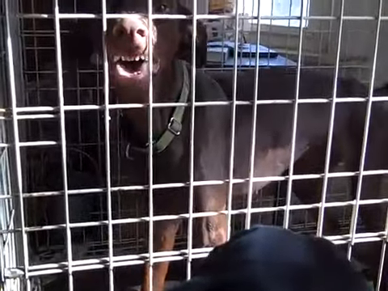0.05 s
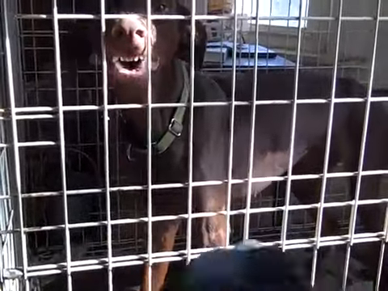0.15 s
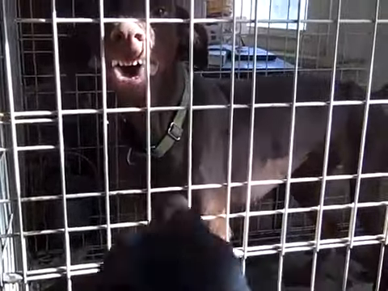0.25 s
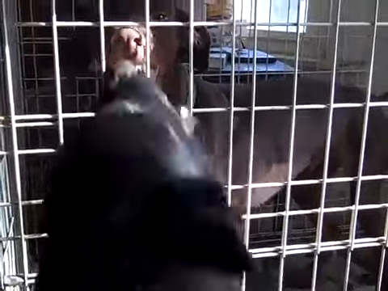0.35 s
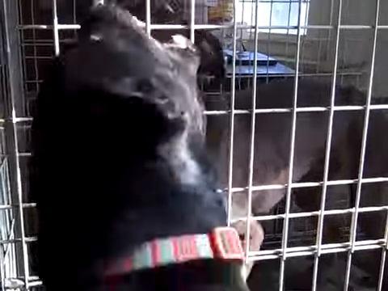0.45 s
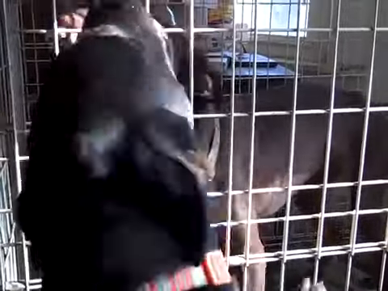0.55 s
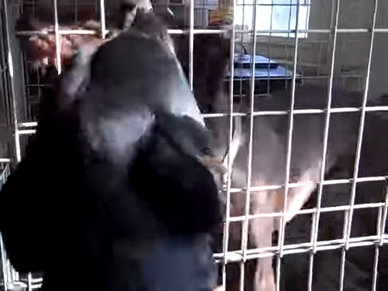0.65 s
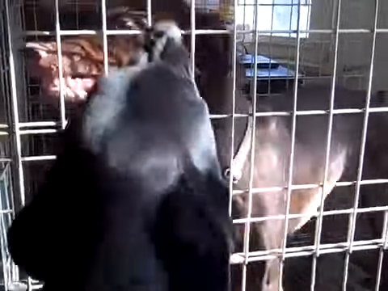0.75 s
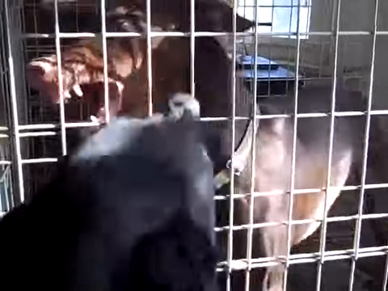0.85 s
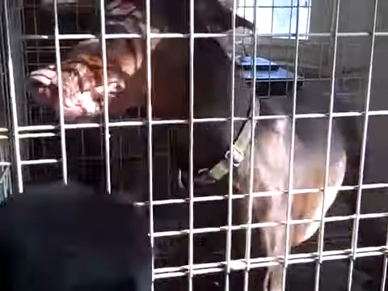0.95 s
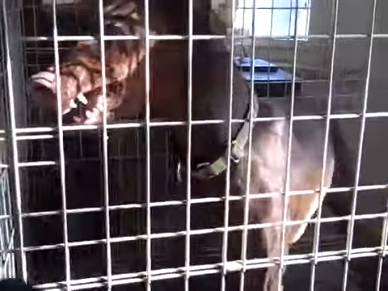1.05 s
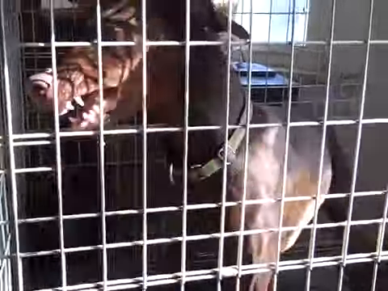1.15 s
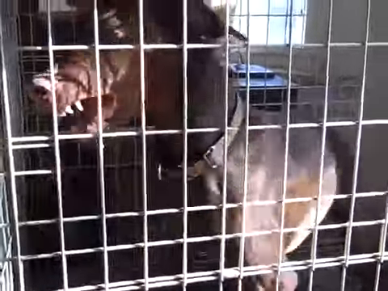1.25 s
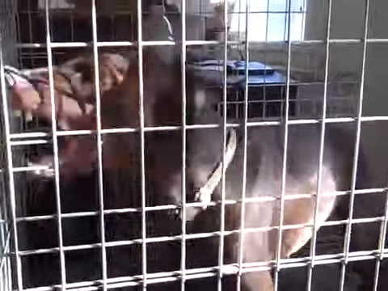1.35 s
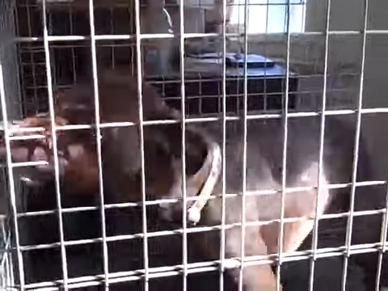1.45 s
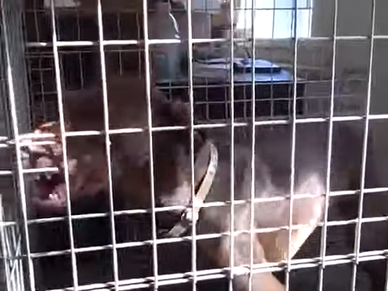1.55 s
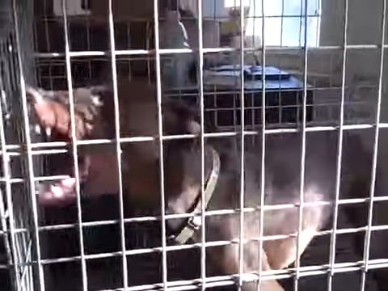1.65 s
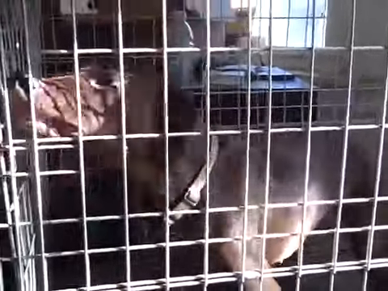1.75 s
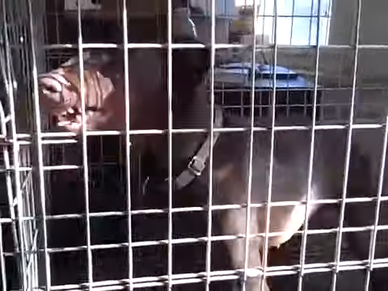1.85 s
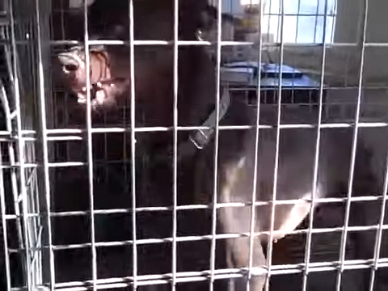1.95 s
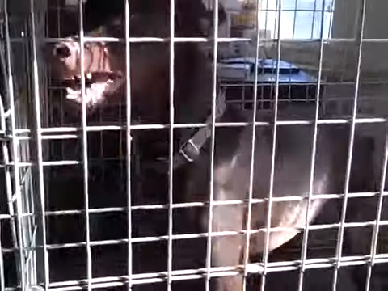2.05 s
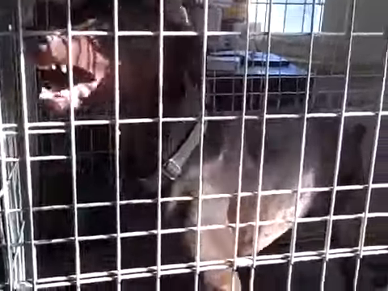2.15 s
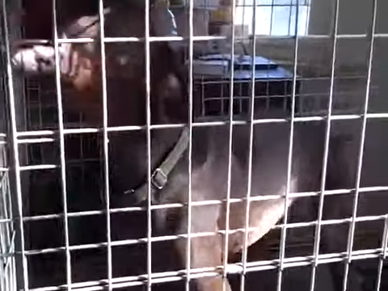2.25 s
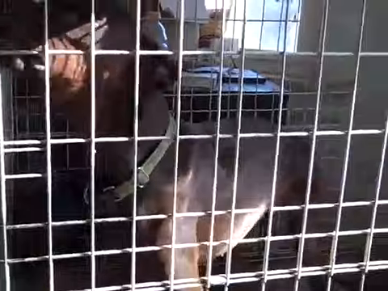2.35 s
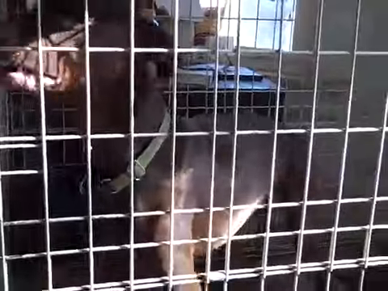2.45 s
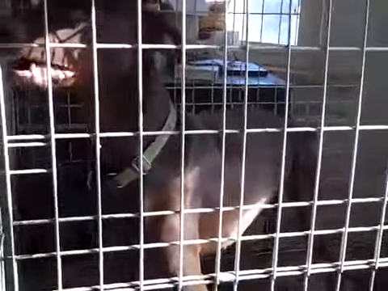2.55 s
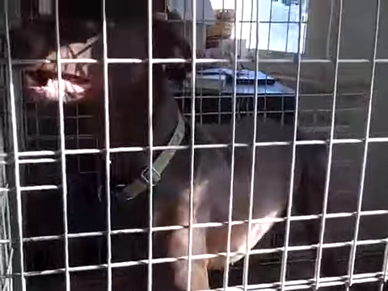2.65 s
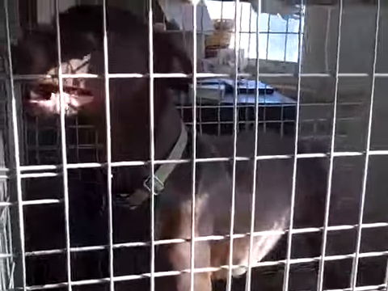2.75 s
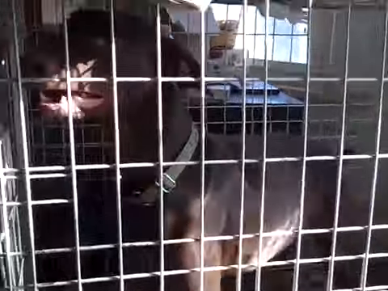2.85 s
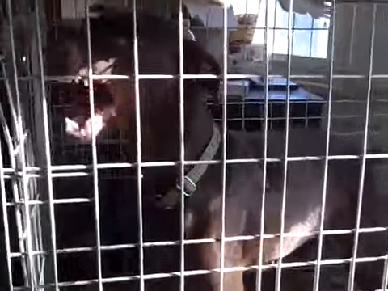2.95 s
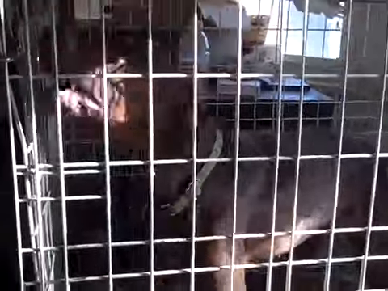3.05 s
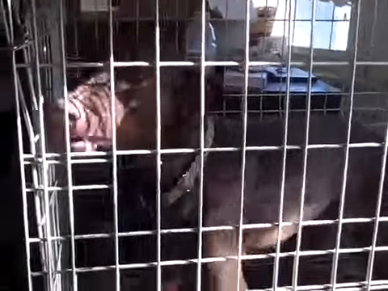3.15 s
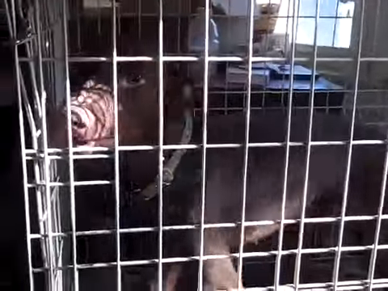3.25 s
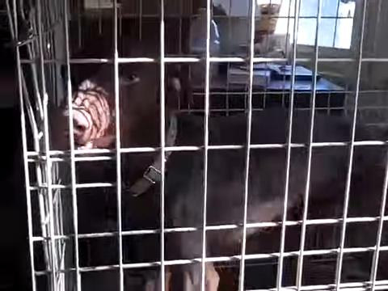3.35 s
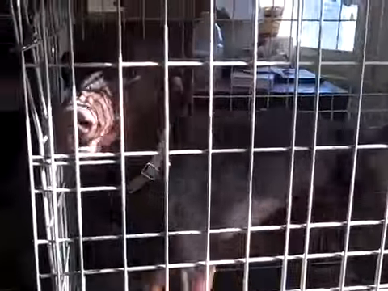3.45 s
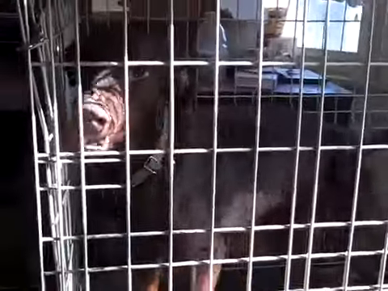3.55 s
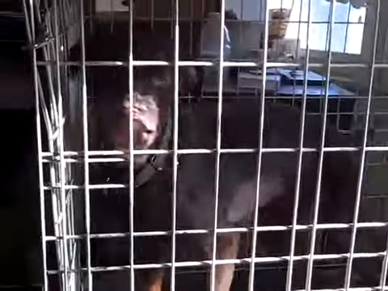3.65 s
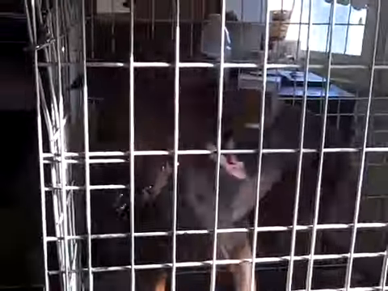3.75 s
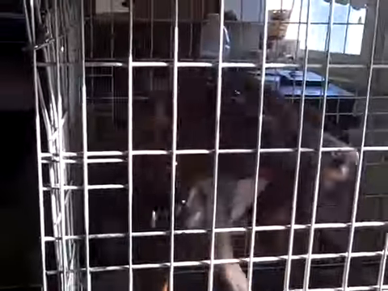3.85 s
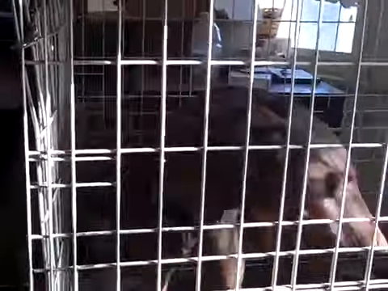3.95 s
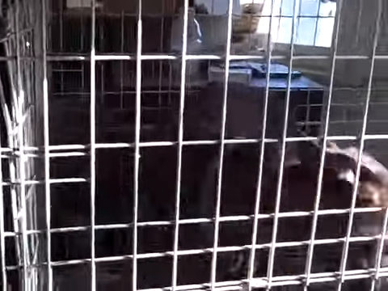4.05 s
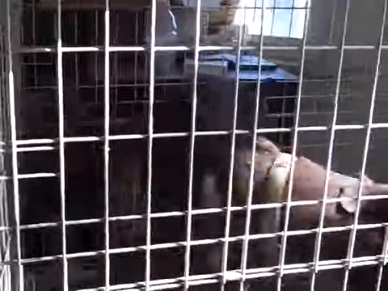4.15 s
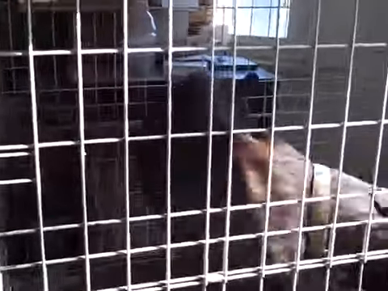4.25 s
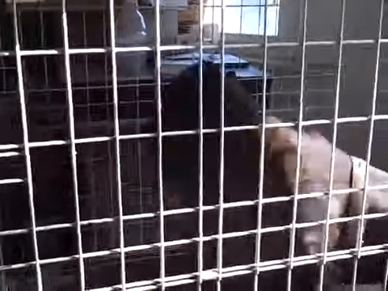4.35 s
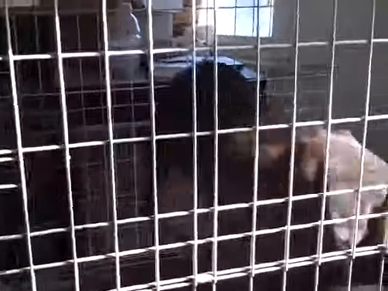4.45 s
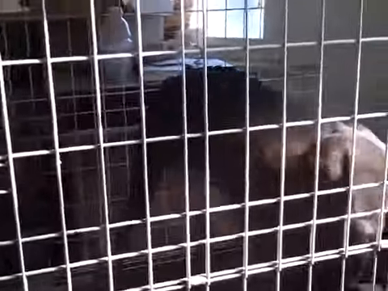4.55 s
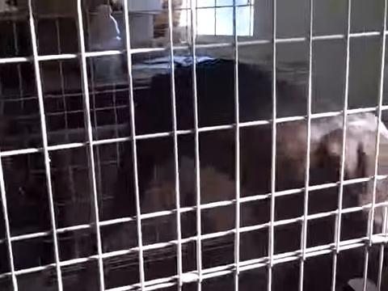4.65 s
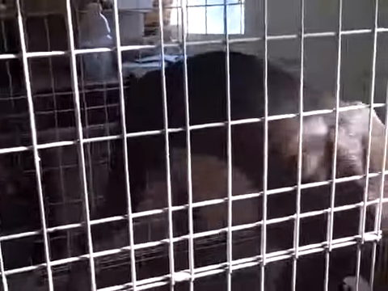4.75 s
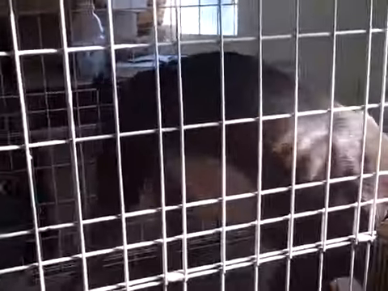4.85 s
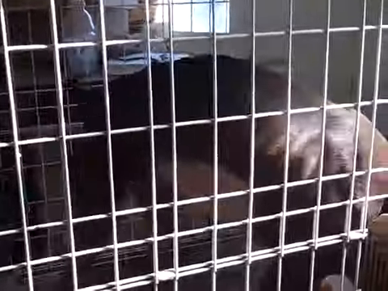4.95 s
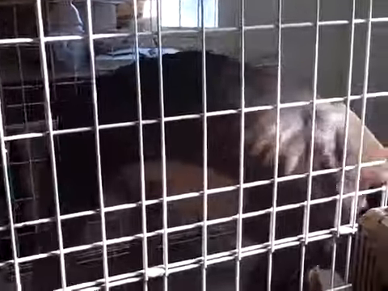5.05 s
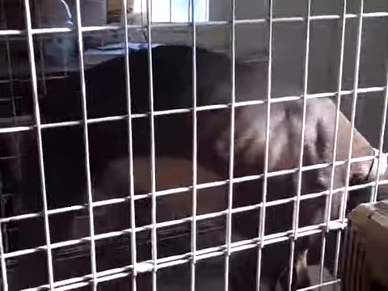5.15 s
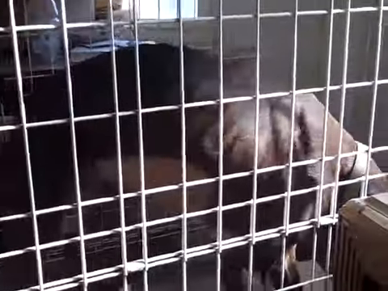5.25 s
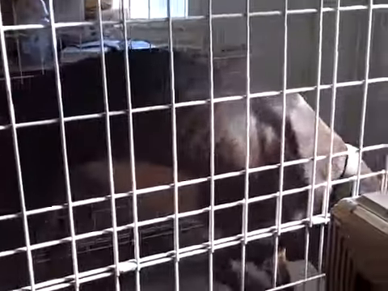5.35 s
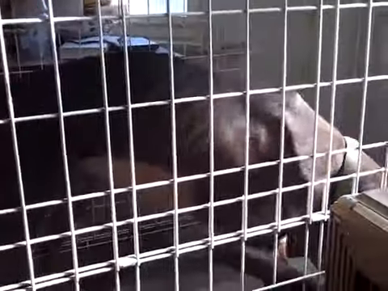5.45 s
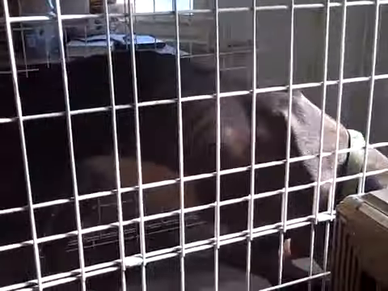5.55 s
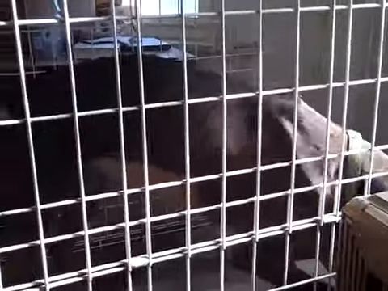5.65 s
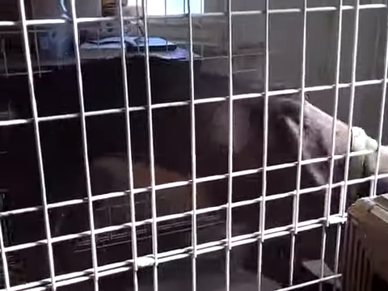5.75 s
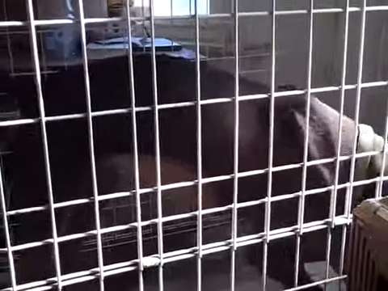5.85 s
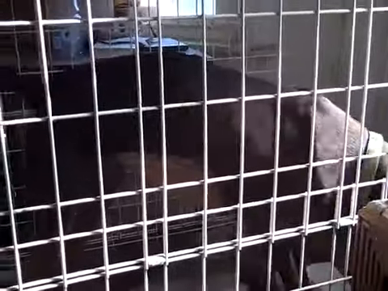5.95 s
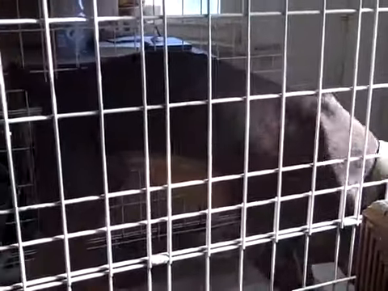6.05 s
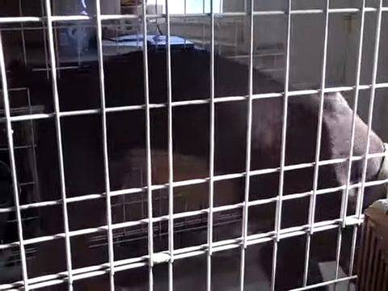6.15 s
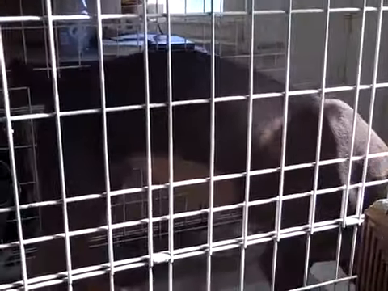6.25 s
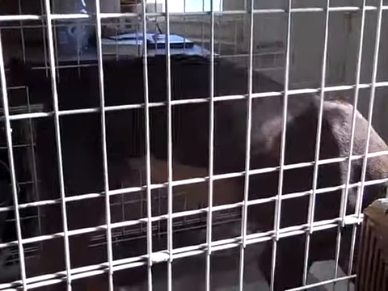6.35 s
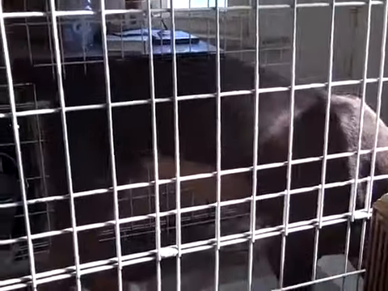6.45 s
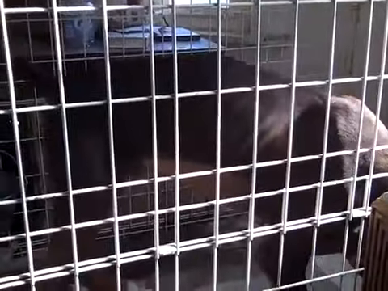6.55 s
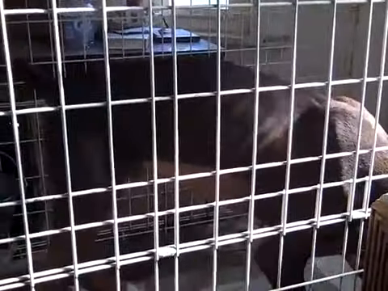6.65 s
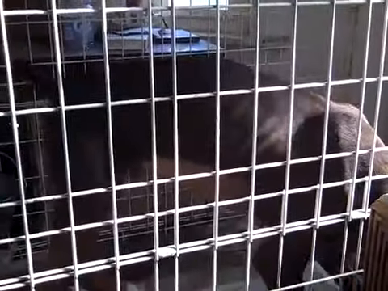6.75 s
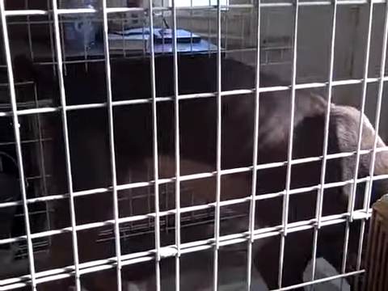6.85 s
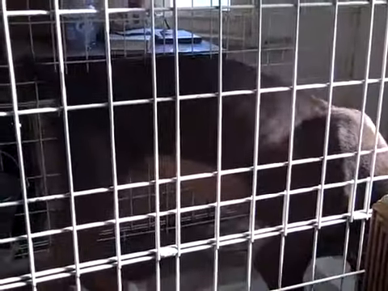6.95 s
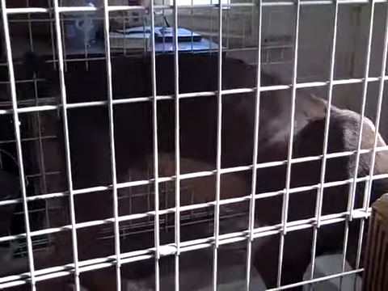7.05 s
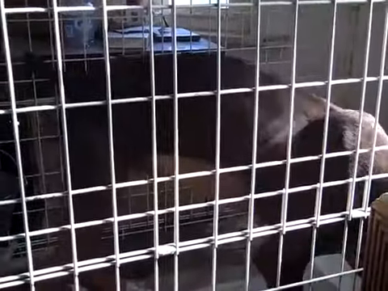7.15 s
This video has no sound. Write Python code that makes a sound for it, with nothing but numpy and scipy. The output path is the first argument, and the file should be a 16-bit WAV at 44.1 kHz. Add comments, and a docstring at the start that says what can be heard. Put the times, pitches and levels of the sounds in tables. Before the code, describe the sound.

Hoarse dog yelps, a rough snarl over a violently rattling wire crate, four sharp close barks, then paw thuds and metallic clinks indoors.

```python
"""Hoarse yelps with a thin whistle, a snarl, then sharp close barks: two dogs quarrel through a wire crate indoors.
Voices are sums of partials shaped by throat and mouth; the snarl is resonant noise gated by slow, uneven flaps.
The crate rattles (filtered clicks) and its tray thuds (noise ringing resonances) as the dog turns round.
A room tail and a faint room tone surround it; loud barks overload the recorder."""
import sys
import numpy as np
from scipy import signal
from scipy.fft import rfft, irfft, next_fast_len
from scipy.io import wavfile

SR = 44100
rng = np.random.default_rng(int(sys.argv[2]) if len(sys.argv) > 2 else 0)


def digitize_waveform(pressure):
    """Quantize a signal to 16-bit integers and store it at the path in sys.argv[1].

    Rows of a 2-D input are taken as channels; values are limited to [-1, 1].
    """
    field = np.atleast_2d(pressure).T
    bounded = np.clip(field, -1, 1)
    quanta = np.round(bounded * 32767).astype(np.int16)
    wavfile.write(sys.argv[1], SR, quanta)


N = 317079
TIME = np.arange(N) / SR


def from_db(db):
    """Decibels to gain."""
    return 10 ** (np.asarray(db) / 20)


def rms_one(x):
    """Scale to rms 1."""
    return x / np.sqrt(np.mean(x ** 2) + 1e-20)


def at_hz(points, hz):
    """Read a two-column table, linear in log frequency."""
    table_hz, values = np.array(points)[:, 0], np.array(points)[:, 1]
    return np.interp(np.log(hz), np.log(table_hz), values)


def bin_hz(size):
    """Frequencies of a real FFT, held above 0 for the log axis."""
    return np.maximum(np.arange(size // 2 + 1) * SR / size, 5)


def faded(start_s, end_s, rise_s=0.005):
    """Sample range between two times, with a short fade at both ends."""
    span = slice(int(start_s * SR), min(int(end_s * SR), N))
    t = TIME[span]
    return span, np.clip(np.minimum((t - t[0]) / rise_s, (t[-1] - t) / 0.0024), 0, 1)


def during(rows, rise_s=0.0031):
    """Sample range of a table, its fades, and its columns interpolated along that range."""
    s, *columns = np.transpose(rows)
    span, fade = faded(s[0], s[-1], rise_s)
    return span, fade, [np.interp(TIME[span], s, c) for c in columns]


def drift(rate_hz, size):
    """Random drift of rms 1: white noise through a two-pole low-pass."""
    r = np.exp(-2 * np.pi * rate_hz / SR)
    noise = rng.standard_normal(size + 4000)
    settled = signal.lfilter([1], [1, -2 * r, r * r], noise)[4000:]
    return rms_one(settled)


def coloured(x, points):
    """Filter by a table of relative dB; white noise keeps its power."""
    length = x.shape[-1]
    size = next_fast_len(length + 2048)
    gain = from_db(at_hz(points, bin_hz(size)))
    return irfft(rfft(x, size) * gain / np.sqrt(np.mean(gain ** 2)), size)[..., :length]


def resonate(x, modes):
    """Parallel two-pole resonances with alternating signs."""
    out = 0
    for k, (hz, width_hz, level_db) in enumerate(modes):
        r = np.exp(-np.pi * width_hz / SR)
        top = (1 - r * r) / 2 * np.array([1, 0, -1])
        bottom = [1, -2 * r * np.cos(2 * np.pi * hz / SR), r * r]
        out = out + (-1) ** k * from_db(level_db) * signal.lfilter(top, bottom, x + 1e-18)
    return out


def wandering(hz, width_hz):
    """Noise in a resonance whose centre moves: two drifts on quadrature carriers; rms about 1."""
    turn = 2 * np.pi * np.cumsum(hz) / SR
    return drift(width_hz, len(hz)) * np.cos(turn) + drift(width_hz, len(hz)) * np.sin(turn)


def widened(mid, side):
    """Stereo pair whose left-right likeness falls with frequency."""
    # Each row: frequency in Hz, left-right likeness 0-1.
    likeness = [(60, 1), (240, 0.9), (950, 0.82), (3770, 0.23), (15000, 0.091)]
    alike = np.clip(at_hz(likeness, bin_hz(N)), 0, 1)
    common = np.sqrt(1 + alike) * rfft(mid)
    apart = np.sqrt(1 - alike) * rfft(side) * [[1], [-1]]
    return irfft(common + apart, N) / np.sqrt(2)


def voice(pitch_hz, rough, half, blur, throat_db, count):
    """Vocal folds through the throat; rough folds wobble in pitch and strength, half adds half-pitch lines."""
    size = len(pitch_hz)
    wobbling_hz = pitch_hz * (1 + .16 * rough * drift(150, size))
    turn = np.cumsum(wobbling_hz) * np.pi / SR   # phase at half pitch
    out, power = 0, 0
    for k in range(2, count):   # odd k: half-pitch lines
        flicker_db = 7 * rough * drift(40, size)
        share = np.clip(half, 0, 1) if k % 2 else 1
        gain = from_db(throat_db(k / 2) + flicker_db) * share
        slip = blur * (k * pitch_hz / 4000) ** 2 * drift(52.4, size)   # high partials lose step
        out = out + gain * np.sin(k * turn + .35 * k * k + slip)
        power = power + gain ** 2 / 2
    return out / np.sqrt(power) * from_db(4 * rough * drift(70, size))


def room_tone():
    """Steady stereo noise with the colour of the room."""
    # Room tone spectrum. Each row: frequency in Hz, relative level in dB per Hz.
    tone_colour = [(15, -55), (25, -12.5), (177, -1), (286, -5), (616, -8.5), (741, -10), (1100, -10.5),
                   (2080, -13), (2860, -15.5), (6670, -13.5), (8030, -10), (11000, -36.5), (14000, -26)]
    level_db = -47.5
    noise = rms_one(coloured(rng.standard_normal((2, N)), tone_colour))
    return from_db(level_db) * widened(*noise)


def room(x):
    """Near walls answer in a short dense burst; ten feedback delays a side carry the long tail."""
    # Tail decay. Each row: frequency in Hz, t60 in s.
    decay = [(100, 0.74), (850, 0.65), (2000, 0.59), (4000, 0.36), (10000, 0.21)]
    size = next_fast_len(N + SR)
    hz = bin_hz(size)
    t60_s, tail = at_hz(decay, hz), np.zeros((2, len(hz)), complex)
    for k, lag_s in enumerate(rng.uniform(.03, 0.082, 20)):
        loop = from_db(-60 * lag_s / t60_s) * np.exp(-2j * np.pi * hz * lag_s)
        tail[k % 2] += loop / (1 - loop) * (-1) ** (k // 2)
    since = TIME[:8000]
    near = rng.standard_normal((2, 8000)) * from_db(-60 * since / 0.27) * (since > .004)
    near = signal.lfilter([.45], [1, -.55], near)   # the walls take some treble
    walls = from_db(-37.0) * rfft(near, size) + from_db(-24.5) * tail
    shared = walls + 0.48 * walls[::-1]   # both ports hear much the same room
    return irfft(shared * rfft(x, size), size)[:, :N]


def paws():
    """Paws on the tray: a decaying noise burst rings a low, a higher and a fixed boom resonance."""
    # Each row: start in s, peak in dB, lowest paw resonance in Hz.
    steps = [(2.215, -27, 443), (2.264, -28.5, 132), (2.924, -27, 200), (3.048, -27, 580),
             (3.715, -30, 234), (3.759, -22.5, 230), (4.287, -29, 194), (4.394, -21, 294),
             (4.509, -18.5, 496), (4.597, -25, 152), (4.791, -29, 111), (4.956, -22, 197), (5.229, -37, 88),
             (5.948, -32, 172), (6.017, -24.5, 192), (6.069, -30, 564), (6.793, -21.5, 890),
             (6.868, -29.5, 404)]
    noise_t60_s, boom_hz, boom_db = 0.25, 86, -1.5
    out = np.zeros(N)
    since = TIME[:9000]
    dying = from_db(-60 * since / noise_t60_s) * (1 - np.exp(-since / 0.00067))
    for s, peak_db, hz in steps:
        modes = [(hz, 0.77 * hz, 0), (3.07 * hz, 1.8 * hz, -9), (boom_hz, 50, boom_db)]
        thud = resonate(rng.standard_normal(9000) * dying, modes)
        at = int(s * SR)
        out[at:at + 9000] += from_db(peak_db) * thud / np.max(np.abs(thud))
    return out


def stray_ticks(count):
    """Faint blows at random moments as the wire settles, in the columns of the blow table."""
    from_s, least_db, t60_s = 4.3, -45, .045
    return [(from_s + when * (N / SR - from_s), least_db + 8 * size, t60_s, -8 * dull)
            for when, size, dull in rng.random((count, 3))]


def wire_clicks():
    """Two stereo streams of dense clicks, uneven in size, sign and rate."""
    sizes_db = 3.3 * np.minimum(rng.exponential(1, (4, N)), 5)
    sizes = from_db(sizes_db) * rng.choice([-1, 1], (4, N))
    clicks_per_s = 5000 * from_db(4.0 * drift(30, N))
    clicks = rms_one(sizes * (rng.random((4, N)) < clicks_per_s / SR))
    return widened(*clicks[:2]), widened(*clicks[2:])


def crate():
    """Wire clicks follow the shaking and dying blows, band by band, and ring the wire; the tray shuffles."""
    # Bouts of shaking. Each row: time in s, level in dB before the wire's colour.
    rattle = [
        [(0.8, -43), (0.85, -31), (0.91, -25.5), (1.02, -23.5), (1.09, -23), (1.25, -29.5), (1.35, -18),
         (1.43, -24)],
        [(2.0, -43), (2.142, -38), (2.216, -28.5), (2.335, -38)],
        [(2.76, -53), (2.974, -34), (3.09, -37)],
        [(3.56, -52), (3.652, -37.5), (3.772, -28.5), (3.815, -48)],
        [(4.18, -88), (4.33, -53), (4.49, -40.5), (4.61, -37.5), (4.76, -59), (4.89, -24.5), (4.915, -27),
         (4.96, -39), (5.09, -46.5), (5.25, -49), (5.52, -79), (5.76, -72), (5.88, -33), (6.02, -22.5),
         (6.14, -33.5), (6.28, -54), (6.51, -71), (6.65, -50), (6.74, -26), (6.85, -17.5), (7.06, -32),
         (7.19, -34)],
    ]
    # Each row, one per bout: brightness in dB per octave, tray level in dB while the shaking is at -35.5 dB.
    bouts = [(-3, -39), (-4, -48.5), (-4, -48), (-4.5, -50.5), (-0.94, -54)]
    # Blows on the wire. Each row: start in s, nominal level in dB, t60 in s, brightness in dB per octave.
    blows = list([(0.8545, -24, 0.063, -13.5), (1.4349, 6.5, 0.037, -3.3), (2.2163, -23, 0.029, -2),
                  (2.301, -23, 0.025, -16), (2.9198, -25, 0.062, -14), (3.052, -22, 0.017, -10),
                  (3.7184, -33, 0.06, 7), (3.7605, -18.5, 0.033, 2), (3.783, -21, 0.015, -13.5),
                  (4.2265, -35.5, 0.13, 1), (4.2727, -25.5, 0.053, -4), (4.344, -34.5, 0.072, -6),
                  (4.425, -32, 0.074, -6), (4.515, -21, 0.12, -2.5), (4.5365, -14, 0.21, 1.5),
                  (4.7339, -8, 0.12, 3.5), (4.771, -13, 0.1, -2.5), (4.7942, -15.5, 0.13, -5.5),
                  (4.9215, -9, 0.16, 1), (5.095, -29.5, 0.055, -2.5), (5.1741, -25.5, 0.028, -10.5),
                  (5.225, -28.5, 0.11, -5), (5.31, -39, 0.05, -5), (5.4415, -41, 0.22, -6),
                  (5.5053, -35.5, 0.035, -11), (5.7004, -28.5, 0.41, -2.5), (5.722, -24.5, 0.057, -5.5),
                  (5.7697, -33, 0.83, -3), (5.8152, -28, 0.9, 3.5), (5.907, -16.5, 0.15, 7),
                  (6.1494, -24, 0.033, -1.5), (6.2516, -35.5, 0.12, -7), (6.4625, -13, 0.18, 3.5),
                  (6.6184, -23, 0.12, 0.5), (6.7047, -12, 0.042, -1.5), (6.783, -8, 0.16, -2),
                  (6.8125, -14, 0.061, 1), (6.8784, -12.5, 0.18, 4), (6.9105, -26, 0.057, 11),
                  (7.0094, -24.5, 0.87, -2.5)]) + stray_ticks(count=8)
    # Wire spectrum. Each row: frequency in Hz, relative level in dB per Hz.
    wire_colour = [(410, -52.5), (700, -15), (848, -20.5), (940, -14), (1120, -22), (1350, -5.5),
                   (2400, 1.5), (3020, -0.5), (7900, 5.5), (13700, -28), (14400, -21), (15000, -80)]
    # Wire resonances. Each row: frequency in Hz, width in Hz, relative level in dB.
    wire_modes = [(995, 33, 1), (1482, 7.8, -15), (1940, 18, -7), (2372, 40, 3.5), (2720, 110, -7.5),
                  (3710, 47, -24.5), (4180, 38, -4.5), (4304, 76, 2), (6475, 93, -2)]
    # Tray spectrum. Each row: frequency in Hz, relative level in dB per Hz.
    tray_colour = [(24, -39), (40, -48), (81, 5), (146, 2), (319, 2.5), (679, -3), (1200, 3), (1560, -13.5),
                   (2640, -120)]
    tray_follows = 0.28   # dB of tray per dB of shaking

    shake, tilt, shuffle = np.zeros((3, N))
    for rows, (tilt_db, bout_db) in zip(rattle, bouts):
        span, fade, (level_db,) = during(rows)
        tray_db = bout_db + tray_follows * (level_db + 35.5)
        shake[span] = fade * from_db(level_db)
        tilt[span] = tilt_db
        shuffle[span] = fade * from_db(tray_db)

    clicks = wire_clicks()
    struck, since = np.zeros((2, N)), TIME[:9000]
    attack = 1 - np.exp(-since / 0.0007)
    crack = 1 + 0.32 * np.exp(-since / 0.0019)
    edges_hz = np.geomspace(600, 15500, 13)
    for k, (low_hz, high_hz) in enumerate(zip(edges_hz, edges_hz[1:])):
        octaves = np.log2(np.sqrt(low_hz * high_hz) / 4000)
        patches_db = 2.6 * drift(9, N)
        level = np.tile(shake * from_db(tilt * octaves + patches_db), (2, 1))
        chance_db = rng.normal(0, 2.7, len(blows))   # each blow differs from band to band
        for (s, peak_db, t60_s, tilt_db), extra_db in zip(blows, chance_db):
            start_db = peak_db - 3.5 + extra_db + tilt_db * octaves
            dying = from_db(start_db - 60 * since / max(t60_s, .01)) * crack
            at = int(s * SR)
            level[:, at:at + 9000] += (dying * attack)[:N - at]
        band = signal.butter(2, [low_hz, high_hz], "band", fs=SR, output="sos")
        struck += signal.sosfilt(band, clicks[k % 2] * level)
    tray = shuffle * from_db(4.5 * drift(12, N))
    tray = tray * rms_one(coloured(rng.standard_normal(N), tray_colour))
    return coloured(struck + 1.15 * resonate(struck, wire_modes), wire_colour), tray


def snarl():
    """Slow, very uneven flaps of the folds gate the air in the chest and mouth resonances."""
    # Each row: time in s, chest level in dB, mouth resonance in Hz, mouth level in dB.
    growls = [
        [(0.8, -69, 860.5, -28.5), (0.824, -47, 800, -33.5), (0.97, -61, 700, -28.5), (1.0, -40, 716, -39),
         (1.052, -36, 900, -26.5), (1.146, -23, 740, -29), (1.252, -29, 670, -39), (1.304, -26.5, 597.5, -30.5),
         (1.348, -32, 616, -30.5), (1.404, -27, 656, -22), (1.43, -26.5, 657, -19)],
        [(2.02, -50, 798, -60.5), (2.076, -54.5, 760, -51), (2.186, -38, 715, -58), (2.27, -33.5, 600, -34),
         (2.33, -51, 800, -75)],
        [(2.88, -90, 1003, -69), (2.932, -33.5, 1000, -84), (3.026, -41.5, 623, -40), (3.085, -58, 590, -70)],
        [(3.58, -85, 733, -87), (3.642, -40.5, 750, -39), (3.714, -36.5, 780, -47.5), (3.81, -44, 646, -51)],
    ]
    chest_centre_hz, chest_wander_hz, chest_swing = 220.7, 4.97, .12
    flap_leak = .3   # air that passes between flaps
    out = np.zeros(N)
    chest = chest_centre_hz * np.exp(chest_swing * drift(chest_wander_hz, N))
    for rows in growls:
        span, fade, (chest_db, mouth_hz, mouth_db) = during(rows)
        chest_hz = chest[span]
        flap_hz = 45 * from_db(4.0 * drift(17, len(fade)))
        cycle = np.cumsum(flap_hz) / SR
        flaps = rms_one(flap_leak + np.exp(-3.0 * (cycle % 1)))
        low = wandering(chest_hz, 30) + 0.7 * wandering(2 * chest_hz, 110)
        high = wandering(mouth_hz, 60) + .6 * wandering(1.5 * mouth_hz, 140)
        out[span] = fade * flaps * (from_db(chest_db) * low + from_db(mouth_db) * high)
    return out


def thin_tones():
    """Gliding tones with one overtone, swelling and fading beside the voices."""
    # A whistle from the nose, two falling moans, a low and a high hum in the snarl. Each row: start in s,
    # length in s, from Hz, to Hz, peak rms level of the fundamental in dB, peak at share of length 0-1.
    tones = [(0.115, .075, 2925, 2880, -16, .6), (1.465, .095, 650, 520, -12, .2),
             (3.2, .06, 470, 340, -13, .15), (1.25, .19, 128, 145, -26, .45),
             (1.345, .09, 1000, 1035, -26, .3)]
    edge_db = -27   # at both ends, against the peak
    out = np.zeros(N)
    for s, length_s, from_hz, to_hz, peak_db, peak_at in tones:
        span, fade = faded(s, s + length_s)
        share = np.linspace(0, 1, len(fade))
        away = np.where(share < peak_at, 1 - share / peak_at, (share - peak_at) / (1 - peak_at))
        turn = 2 * np.pi * np.cumsum(from_hz + (to_hz - from_hz) * share) / SR
        tone = np.sqrt(2) * (np.sin(turn) + 0.38 * np.sin(2 * turn))
        out[span] += fade * from_db(peak_db + edge_db * away ** 2) * tone
    return out


def yelps():
    """Long hoarse cries: partials and hiss through a mouth that opens and closes."""
    # Each row: time in s, pitch in Hz, level in dB, mouth resonance in Hz.
    cries = [
        [(0.0, 129, -27.5, 503), (0.048, 152.4, -24, 473), (0.104, 162.6, -22, 870), (0.158, 189.4, -13, 1260),
         (0.19, 219, -15.5, 1070)],
        [(0.18, 363.6, -6.5, 980), (0.215, 399, -14.5, 1110), (0.24, 429, -3.5, 1130), (0.262, 453, -14, 1050),
         (0.284, 529, -5.5, 990), (0.3, 446, -7, 1084), (0.33, 486.3, -9.5, 1025), (0.39, 472, -26, 988)],
        [(0.41, 351, -22, 767), (0.428, 380, -15.5, 790), (0.5, 348.3, -6, 812), (0.528, 393.3, -12, 760),
         (0.546, 383, -13.5, 760), (0.61, 440, -16, 870), (0.625, 440.4, -6.5, 880), (0.64, 436, -14, 890),
         (0.652, 399, -8, 904), (0.67, 419, -7.5, 815), (0.73, 381.7, -17.5, 850), (0.754, 287.4, -18.5, 610),
         (0.81, 283, -39, 676)],
        [(1.73, 208.3, -20.5, 646), (1.777, 254.3, -15, 730), (1.784, 264, -6.5, 784), (1.812, 292, -10.5, 800),
         (1.822, 293.2, -21.5, 800), (1.87, 297, -23, 850)],
    ]
    # Each row, one per cry: fundamental in relative dB, brightness in dB per octave, both before roughness.
    cry_voice = [(-8.5, 2.5), (-2.5, -1), (-10.5, -0.5), (-8.5, 2)]
    # How the cries break up. Each row: time in s, roughness 0-1.
    hoarse = [(0, .25), (.09, .1), (.17, .2), (.2, .08), (.25, .08), (.27, .4), (.31, .2), (.36, .4),
              (.44, .6), (.5, .5), (.54, .12), (.6, .1), (.645, .45), (.68, .2), (.81, .25), (1.73, .3),
              (1.775, .1), (1.81, .08), (1.87, .3)]
    # Throat response. Each row: frequency in Hz, relative level in dB.
    throat = [(76, -51), (130, 24), (340, 1.5), (420, 0.5), (570, 1.5), (840, -4.5), (1130, -8),
              (1400, -7.5), (1750, -11.5), (2400, -16.5), (2800, -27), (6000, -59)]
    # Hiss spectrum. Each row: frequency in Hz, relative level in dB per Hz.
    hiss_colour = [(1200, 3.5), (2400, 10), (4500, -3), (7500, 6), (10000, -14), (14000, -25.5),
                   (15000, -50)]
    # half-pitch share grows with roughness
    half_from_rough, half_per_rough, half_most = .12, 1.6, .5
    # a rougher cry has a weaker fundamental and a brighter top
    fundamental_per_rough_db, tilt_per_rough_db = -34, 10

    out = np.zeros(N)
    for rows, (first_db, tilt_db) in zip(cries, cry_voice):
        span, fade, (pitch_hz, level_db, mouth_hz) = during(rows, rise_s=.014)
        rough = np.interp(TIME[span], *np.transpose(hoarse))
        half = np.clip(half_per_rough * (rough - half_from_rough), 0, half_most)
        weak_db = first_db + fundamental_per_rough_db * rough
        bright_db = tilt_db + tilt_per_rough_db * rough

        def throat_db(k):
            """Level of partial k: throat, moving mouth, brightness, weak fundamental."""
            hz = k * pitch_hz
            mouth_db = 10.0 * np.exp(-(np.log(hz / mouth_hz) / 0.38) ** 2)
            return at_hz(throat, hz) + mouth_db + bright_db * np.log2(hz / 850) + weak_db * (k < 1.6)

        cry = voice(pitch_hz, rough, half, .7 + 6 * rough, throat_db, count=36)
        hiss = coloured(rng.standard_normal(len(fade)), hiss_colour) * from_db(-13) * (rough + 0.15)
        out[span] += fade * from_db(level_db) * (cry + hiss)
    return out


def barks():
    """Folds blown open roughly glide up to a cleaner note; returns voice with rasp, breath, puffs of air."""
    # Each row: start in s, length in s, opening pitch in Hz before creep, note at the end in Hz,
    # level in dB at the burst time before the dip, burst time constant in s, nominal breath in dB,
    # air puff on the microphone in dB before its low-pass, half-pitch share 0-1 before the burst fades it.
    calls = [(1.44, 0.1, 284.2, 444.8, -5.5, 0.039, -6.5, -15, .5),
             (2.343, 0.095, 265, 433.6, -4.5, .036, -4, -10, 0),
             (3.097, 0.11, 304.8, 459, -4.5, 0.038, -5.5, -14, 0.13),
             (3.823, 0.12, 319.8, 436.8, -4.5, 0.048, -4, -15, 0.6)]
    # Throat response. Each row: frequency in Hz, relative level in dB.
    throat = [(180, -14), (300, -13.5), (411, -5), (868, 5), (1280, -4.5), (1740, -3), (2160, -9.5),
              (2560, -25), (3190, -20), (4000, -44), (5200, -65), (8800, -120)]
    # Breath spectrum. Each row: frequency in Hz, relative level in dB per Hz.
    breath_colour = [(90, -19.5), (250, -16.5), (700, -13), (1400, -31.5), (2000, -12), (4050, -22),
                     (11200, -35), (14500, -35), (15300, -71)]
    # Air through the teeth while the note lasts. Each row: frequency in Hz, relative level in dB per Hz.
    rasp_colour = [(2000, -35.5), (3200, -4), (4300, -11.5), (5300, 1), (7500, 1), (9500, -11.5),
                   (14000, -26), (15000, -41.5)]
    attack_s, fall_db_per_s, release_s, release_db_per_s = 0.0049, 66, 0.022, 588
    # the pitch holds for a share of the burst, glides up to the note and creeps on until its end
    hold_share, glide_s, creep_hz_per_s = .3, .008, 301
    # the voice dips as the burst gives way to the note
    break_db, break_s = -3.5, 0.006
    # brightness in dB per octave: in the burst, in the note, and the note's loss per second
    open_tilt_db, note_tilt_db, dulling_db_per_s = -5.5, 4.5, 72
    # the opening mouth rings low; the puff lasts a share of the burst
    open_mouth_hz, open_mouth_db, puff_share = 668, 5, 0.77

    out, breath, rasp, puff = np.zeros((4, N))
    for s, length_s, open_hz, note_hz, peak_db, burst_s, breath_db, puff_db, half in calls:
        span, fade = faded(s, s + length_s + release_s)
        t = TIME[span] - s
        burst = np.exp(-(t / burst_s) ** 3)
        gliding = np.maximum(t - hold_share * burst_s, 0) / glide_s
        below_hz = (note_hz - open_hz) * (1 + gliding) * np.exp(-gliding)
        pitch_hz = note_hz - below_hz + creep_hz_per_s * np.minimum(t - length_s, 0)
        dip_db = break_db * np.exp(-((t - burst_s) / break_s) ** 2)
        release_db = -release_db_per_s * np.maximum(t - length_s, 0)
        fall_db = -fall_db_per_s * (t - burst_s)
        level = np.minimum(t / attack_s, 1) * from_db(peak_db + dip_db + release_db + fall_db)
        dulling_db = note_tilt_db - dulling_db_per_s * (t - burst_s)
        tilt_db = open_tilt_db * burst + (1 - burst) * dulling_db
        rough = .02 + .1 * burst + .06 * half ** 2

        def throat_db(k):
            """Level of partial k: throat, opening mouth and brightness."""
            hz = k * pitch_hz
            mouth_db = open_mouth_db * burst * np.exp(-(np.log(hz / open_mouth_hz) / 0.23) ** 2)
            return at_hz(throat, hz) + mouth_db + tilt_db * np.log2(hz / 850)

        folds = voice(pitch_hz, rough, half * np.sqrt(burst), rough * 4, throat_db, count=20)
        out[span] += fade * level * folds
        breath[span] = fade * from_db(breath_db) * burst
        rasp[span] = fade * level * from_db(-20.5 + 4.6 * drift(71, len(fade)))
        puff[span] = -from_db(puff_db) * np.exp(-(t / (puff_share * burst_s)) ** 3) * fade
    gusts = puff * (1 + 0.5 * np.array([drift(80, N), drift(80, N)]))
    push = signal.sosfilt(signal.butter(2, 60, fs=SR, output="sos"), gusts)
    out += rasp * rms_one(coloured(rng.standard_normal(N), rasp_colour))
    breath_noise = breath * coloured(rng.standard_normal((2, N)), breath_colour)
    return out, breath_noise, push * from_db([[4], [-5]])


def scene():
    """Dogs, crate and room tone, with the room's answer."""
    tone = room_tone()
    wire, shuffle = crate()
    tray = shuffle + paws()
    bark, breath, puff = barks()
    dogs = bark + yelps() + thin_tones() + snarl()
    wet = room(dogs + 0.35 * breath[0] + tray + 1.12 * wire.mean(axis=0))
    return dogs + breath * from_db([[1.5], [-1.5]]) + puff + wire + tray + wet + tone


def gain_control(x, knee_db, share, release_db_s):
    """Adds 3.5 dB, less a share of the level over the knee; acts almost at once, lets go slowly."""
    ramp_db = release_db_s * TIME
    level_db = 20 * np.log10(np.max(np.abs(x), axis=0) + 1e-6)
    held_db = np.maximum.accumulate(level_db + ramp_db) - ramp_db
    turned_db = signal.lfilter([.02], [1, -.98], share * np.maximum(held_db - knee_db, 0))
    return x * from_db(3.5 - turned_db)


def record(dry):
    """Ports colour each side, gain control pulls loud sounds down, peaks flatten, the top is cut."""
    # Microphone ports. Each row: frequency in Hz, left minus right in dB.
    port_balance = [(100, -0.3), (700, -1.5), (4200, -1.5), (6300, -8), (7200, 4.5), (8000, 11),
                    (14000, 12)]
    cutoff_hz = 15900
    left = from_db(at_hz(port_balance, bin_hz(N)))
    ports = np.array([left, np.ones_like(left)]) / np.sqrt((1 + left ** 2) / 2)
    heard = gain_control(irfft(rfft(dry) * ports, N), knee_db=-31.5, share=0.17, release_db_s=7)
    flat = heard / (1 + np.abs(heard / .98) ** 6) ** (1 / 6)
    return signal.sosfilt(signal.cheby2(12, 60, cutoff_hz, fs=SR, output="sos"), flat)


dry = scene()
out = record(dry)
digitize_waveform(out)
```